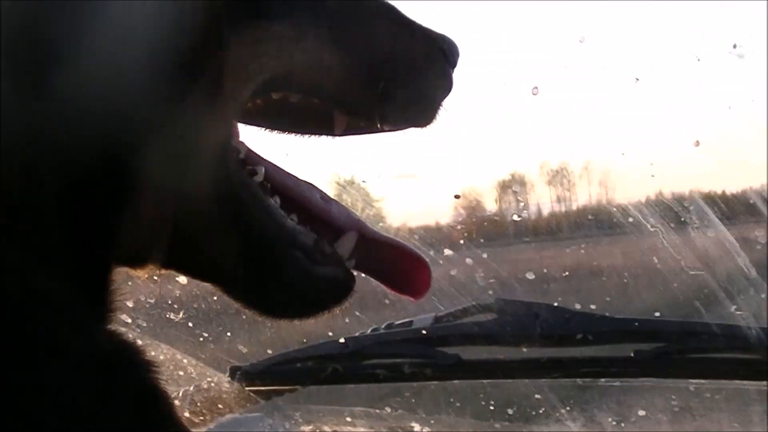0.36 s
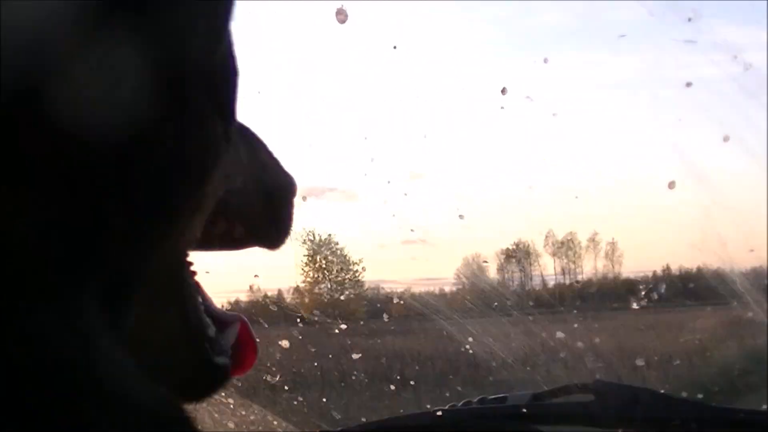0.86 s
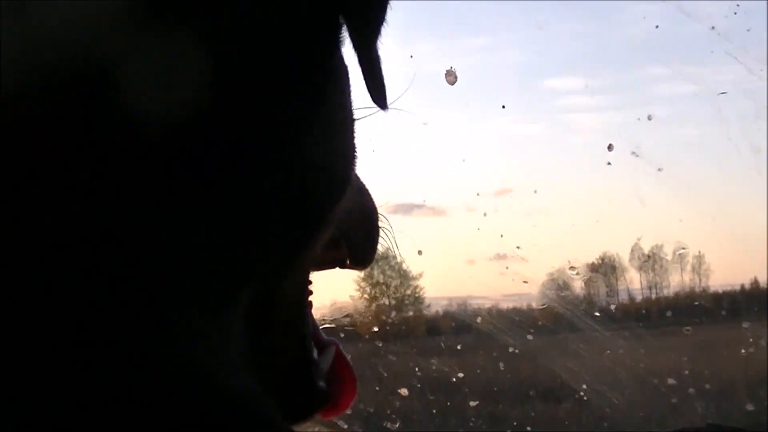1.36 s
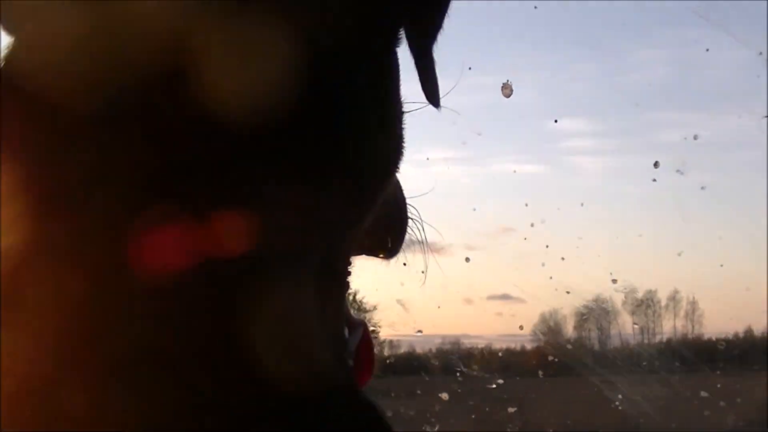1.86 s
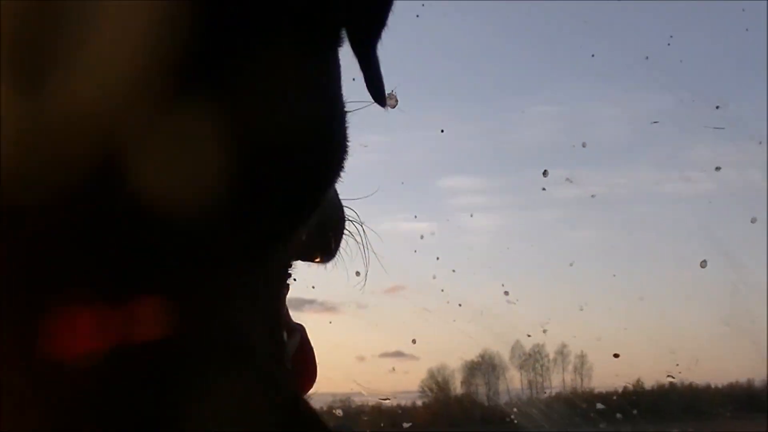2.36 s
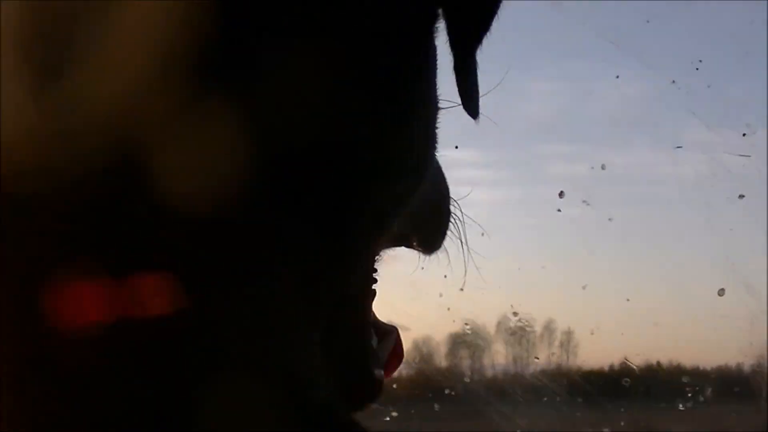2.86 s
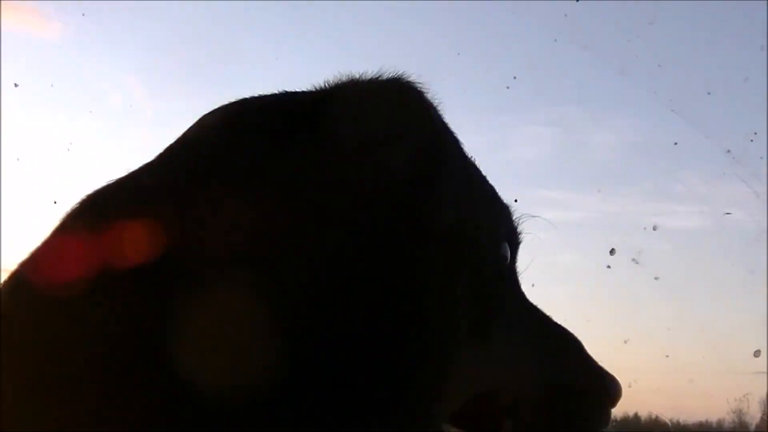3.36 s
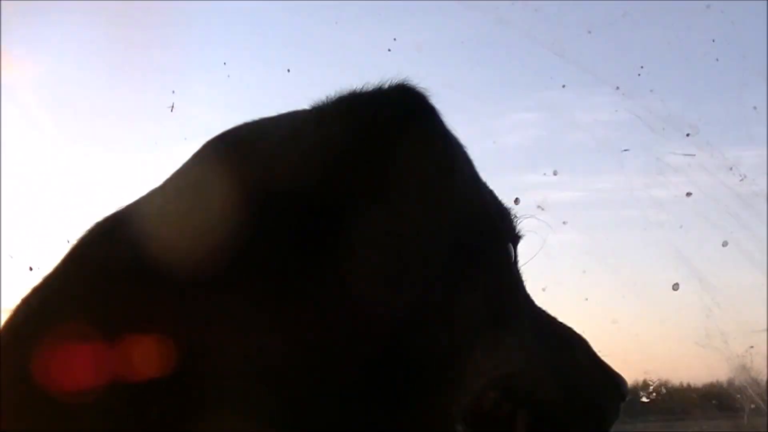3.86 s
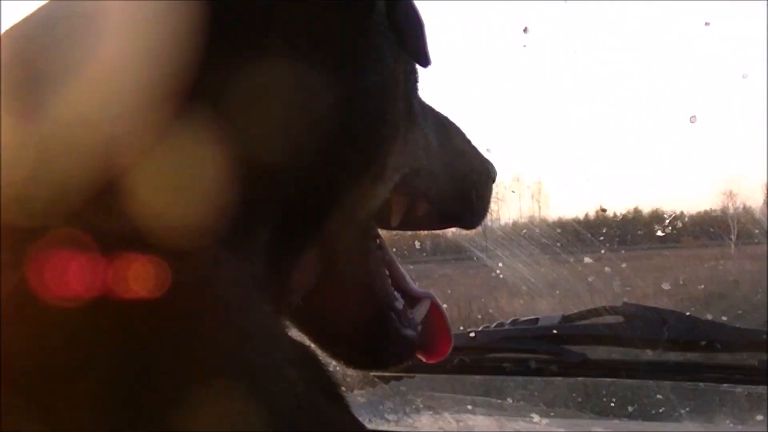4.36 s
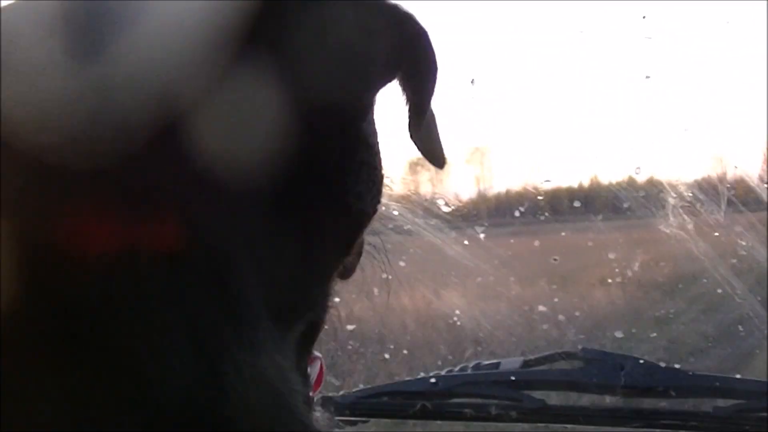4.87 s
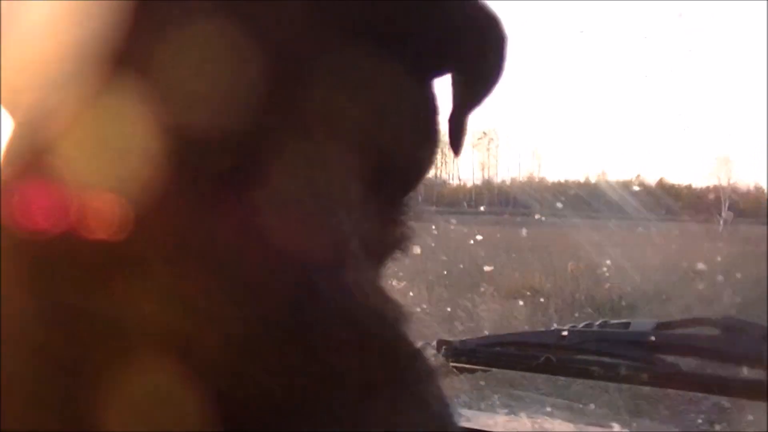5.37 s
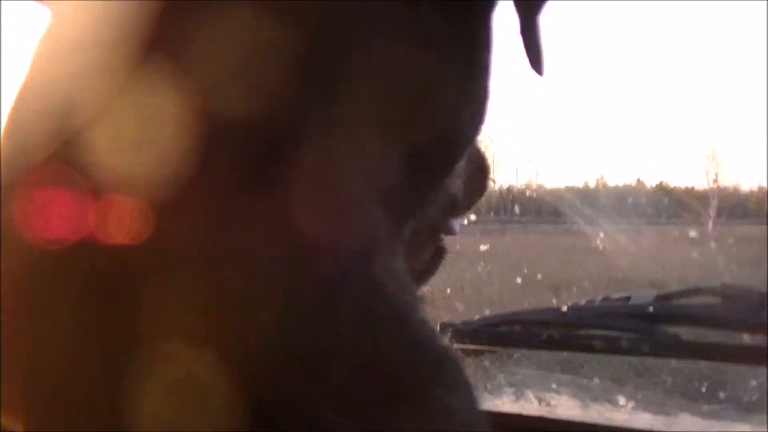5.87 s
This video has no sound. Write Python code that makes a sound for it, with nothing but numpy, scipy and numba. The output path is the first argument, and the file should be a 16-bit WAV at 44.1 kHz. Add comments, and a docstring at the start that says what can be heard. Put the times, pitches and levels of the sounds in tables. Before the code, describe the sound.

A soft, muffled car-cabin hum runs throughout, low under a dog whining very close to the microphone. The sound starts mid-cry, a hoarse scrap ending by 0.2 s, then a gasp at about 0.35 s. A long, raspy whine runs from 0.4 to 1.3 s, briefly clearing to a pitch. Quick breaths near 1.5 s lead to a weaker call until 2.1 s. A rough, lower-pitched, doubled-sounding call lasts 2.4 to 3.0 s; another, 3.2 to 3.9 s, sinks in pitch at its end. After a sharp indrawn breath at 4.1 s comes a strained squeal until 5.1 s, then another breath. From 5.3 s the voice bursts out hard, cracking up into a piercing whine around 5.6 s. The last call follows almost without a gap at 5.97 s, still sounding at the cut, 6.2 s. Small clicks in the throat open several calls; the close cabin gives a very short, dry echo, and peaks clip.

```python
"""Throughout, random noise shaped as the soft hum of a car cabin. A dog, close by, is already whining hoarsely.
Eight calls follow one another: vocal folds snap in mostly chaotic pulses, lock now and then to a clean pitch,
and ring the resonances of throat and mouth. Between calls: shaped-noise breaths and lone fold snaps.
Later calls jump at times towards the octave; the last is still sounding at the end.
A short dry echo follows the voice all along, and the loudest pulses clip."""
import sys
import numpy as np
from scipy import signal
from scipy.fft import rfft, irfft, next_fast_len
from scipy.io import wavfile
from scipy.ndimage import uniform_filter1d, minimum_filter1d, map_coordinates
from numba import njit

SR = 44100
rng = np.random.default_rng(int(sys.argv[2]) if len(sys.argv) > 2 else 0)


def unload_audio(sound):
    """Save the sound as a 16-bit wav file, at the path given as the first command line argument."""
    columns = np.transpose(np.atleast_2d(sound))
    # keep every value between -1 and 1, then stretch to whole-number steps
    steps = np.round(np.clip(columns, -1, 1) * 32767)
    wavfile.write(sys.argv[1], SR, steps.astype(np.int16))


def elevation(decibels):
    """Turn decibel levels (scalar or array-like) into linear amplitude ratios."""
    levels = np.asarray(decibels, float)
    return 10 ** (levels / 20)


N = 274732


def unit(x):
    """Scaled to rms 1."""
    return x / np.sqrt(np.mean(x ** 2) + 1e-20)


def steady(x, seconds):
    """Scaled to rms 1 in a running window."""
    return x / np.sqrt(np.abs(uniform_filter1d(x ** 2, round(seconds * SR))) + 1e-12)


def along(points, hz):
    """(Hz, value) points interpolated on a log frequency axis."""
    f, v = np.transpose(points)
    return np.interp(np.log(hz + 1), np.log(f + 1), v)


def curves(rows):
    """One value per sample for each column after the time."""
    s, *cols = np.transpose(rows)
    return [np.interp(np.arange(N) / SR, s, c) for c in cols]


def phrases(tables, silent):
    """Curves of several tables; the listed columns drop to silence just outside each table."""
    rows = []
    for table in map(np.array, tables):
        before, after = table[0].copy(), table[-1].copy()
        before[0] -= .003
        after[0] += .003
        before[silent] = after[silent] = -80
        rows += [before, *table, after]
    return curves(rows)


def swells(rows, rise_db_per_s, fall_db_per_s):
    """Gain that climbs to each (s, dB) peak and falls away."""
    t = np.arange(N) / SR
    gain = 0
    for s, db in rows:
        gain = gain + elevation(db + np.minimum(rise_db_per_s * (t - s), -fall_db_per_s * (t - s)))
    return gain


def wobble(rate):
    """A smooth random curve, rate knots a second."""
    knots = rng.standard_normal(int(N * rate / SR) + 4)
    return map_coordinates(knots, [np.arange(N) * rate / SR])


def filtered(x, response):
    """x times a complex response of frequency."""
    m = next_fast_len(N + 8192)
    return irfft(rfft(x, m) * response(np.fft.rfftfreq(m, 1 / SR)), m)[..., :N]


@njit
def two_pole(x, a1, a2):
    """A resonator with zeros at both ends of the band; its tuning moves sample by sample."""
    y = np.zeros(len(x))
    for i in range(2, len(x)):
        y[i] = x[i] - x[i - 2] + a1[i] * y[i - 1] - a2 * y[i - 2]
    return y


def resonance(x, hz, width_hz):
    """A resonance applied twice, so that the valleys beside it stay dark."""
    r = np.exp(-np.pi * width_hz / SR)
    a1 = 2 * r * np.cos(2 * np.pi * hz / SR) * np.ones(N)
    return two_pole(two_pole(x, a1, r * r), a1, r * r)


# Cabin noise level. Each row: time in seconds, relative level in dB.
CABIN_LEVEL_DB = [(0, -52.5), (1.3, -52), (4.4, -52.5), (6.23, -52.5)]
# Cabin noise colour. Each row: frequency in Hz, relative density in dB per Hz.
CABIN_COLOUR_DB = [(24, -75), (40, -44.5), (296, 2), (526, -4), (692, -0.5), (1110, -2.5), (1260, -7),
                   (1930, -5), (2080, -9.5), (2480, -5), (3430, -11.5), (4090, -9), (4410, -12),
                   (15800, -40)]
# Cabin noise likeness of left and right. Each row: frequency in Hz, correlation.
CABIN_ALIKE = [(60, 0.92), (240, 1), (950, 0.9), (3770, 0.74), (15000, 0.99)]
CABIN_PATCHY_DB = 1.6


def cabin():
    """Road and engine noise, dulled by the car body: shaped random noise, in slow patches."""
    level_db, = curves(CABIN_LEVEL_DB)

    def mid_side(hz):
        turn = np.arccos(np.clip(along(CABIN_ALIKE, hz), -1, 1)) / 2
        return elevation(along(CABIN_COLOUR_DB, hz)) * [np.cos(turn), np.sin(turn)]

    mid, side = filtered(rng.standard_normal((2, N)), mid_side)
    stereo = unit(np.array([mid + side, mid - side]))
    return elevation(level_db + 16.5 + CABIN_PATCHY_DB * wobble(16)) * stereo


def echo(x, t60_s):
    """Glass and seats return a short dense tail, different at each port."""
    t = np.arange(SR // 5) / SR
    tail = rng.standard_normal((2, len(t))) * elevation(-60 * t / t60_s)
    delayed = np.pad(x, (60, 0))[None]
    return signal.fftconvolve(delayed, tail / np.linalg.norm(tail[0]), axes=1)[:, :N]


# Indrawn breaths. Each row: peak time in seconds, relative peak level in dB.
BREATH_PEAKS_DB = [(.346, -51), (1.432, -56), (1.525, -51.5), (2.32, -64), (3.16, -67), (4.12, -44.5),
                   (5.22, -47)]
# Indrawn air colour. Each row: frequency in Hz, relative density in dB per Hz.
BREATH_COLOUR_DB = [(530, -47), (900, -34), (1920, -10), (2140, -15), (2390, -2), (2580, -1.5), (4100, 3),
                    (5380, -6.5), (12000, -25.5), (15600, -56), (22000, -120)]
BREATH_FLUTTER_DB = 2.8


def breath():
    """Air drawn in through the open mouth between calls: shaped, fluttering noise."""
    air = filtered(rng.standard_normal(N), lambda hz: elevation(along(BREATH_COLOUR_DB, hz)))
    gain = swells(BREATH_PEAKS_DB, rise_db_per_s=142, fall_db_per_s=295)
    return gain * elevation(10 + BREATH_FLUTTER_DB * wobble(90)) * unit(air)


# Voice of each call. Each row: tongue cavity in Hz, rasp re effort in dB, neck leak re throat in dB,
# muzzle overtones re hiss in dB.
VOICES = [(1950, -25.5, -19, -6.5), (2140, -25.5, -29.5, -2.5), (2350, -21.5, -16.5, -5.5),
          (2350, -27, -16.5, -3), (2290, -24, -22.5, 1.5), (2323, -25, -20, -4.5), (2236, -25.5, -21, -10),
          (2450, -21.5, -13, -9)]


def by_call(column):
    """A column of VOICES, held through each call."""
    rows = []
    for call, row in zip(CALLS, VOICES):
        rows += [(s, row[column]) for s in (call[0][0], call[-1][0])]
    return curves(rows)[0]


# Stretches where the folds lock to a pitch, one list each.
# Each row: time in seconds, pitch in Hz, roughness 0-1.
LOCKED = [
    [(.48, 330, .4), (.52, 400, .3)],
    [(.85, 415, .15), (.875, 419, .4), (.9, 413, .12), (.945, 404, .15), (.965, 400, .4), (1.01, 391, .33),
     (1.028, 387.5, .1), (1.05, 383, .12), (1.065, 383, .4), (1.12, 385, .3), (1.16, 385, .4)],
    [(1.75, 450, .22), (1.78, 467, .2), (1.795, 462, .25)],
    [(2.45, 240, .38), (2.69, 230, .33), (2.715, 229, .14), (2.75, 232, .2)],
    [(2.865, 176, .35), (2.9, 174, .1), (2.925, 172, .15)],
    [(3.25, 360, .35), (3.28, 372, .15), (3.305, 374, .18)],
    [(3.39, 382, .35), (3.41, 397, .36), (3.46, 385, .4)],
    [(3.63, 354, .1), (3.67, 340, .14), (3.69, 348, .17), (3.715, 319, .17), (3.74, 295, .16),
     (3.76, 264, .15), (3.795, 274, .14), (3.81, 258, .13), (3.84, 267, .12)],
    [(4.48, 419.5, .3)],
    [(4.575, 410, .15)],
    [(4.71, 365, .3), (4.73, 360, .22), (4.765, 405, .1), (4.78, 408, .04), (4.825, 405, .05)],
    [(4.9, 404, .3), (4.928, 420, .1), (4.95, 414, .22), (5, 398, .12), (5.02, 396, .14), (5.055, 375, .16)],
    [(5.455, 397, .22)],
    [(5.525, 513, .16), (5.545, 523, .13), (5.57, 521, .1), (5.62, 528, .05), (5.66, 509, .06),
     (5.7, 512, .07), (5.72, 497, .07), (5.74, 465, .08), (5.765, 448, .08)],
    [(5.86, 425, .42), (5.92, 410, .4), (5.945, 401, .12)],
    [(6.06, 416, .13), (6.085, 392, .13), (6.105, 398, .35), (6.125, 421, .15), (6.15, 409, .04),
     (6.175, 408, .08), (6.2, 400, .4)],
]
# Second snap halfway through each cycle; near 1 the voice jumps an octave.
# Each row: start in seconds, end in seconds, size 0-1.
JUMPS = [(2.406, 2.693, 0.57), (2.794, 2.94, 0.56), (5.573, 5.768, 0.99), (5.793, 5.972, 0.68),
         (6.12, 6.3, .75)]
# Time before its end at which each of the first six calls turns to breath, in seconds.
RUNS_OUT_S = [.05, .1, .11, .05, .055, .04]
HOARSE, SPENT = .5, .9  # roughness: usual, and as one of the first six calls runs out
SPENT_S, LOCK_S = .03, .022  # time to run out, time to lock


def fold_state():
    """Hoarse by default, cleaner where the folds lock, breathy as the first six calls run out."""
    t = np.arange(N) / SR
    pitch_hz = curves([row for run in LOCKED for row in run])[0]
    rough_rows = []
    for run in LOCKED:
        rough_rows.append((run[0][0] - LOCK_S, HOARSE))
        rough_rows += [(s, r) for s, _, r in run]
        rough_rows.append((run[-1][0] + LOCK_S, HOARSE))
    rough, = curves(rough_rows)
    spent = 0
    for call, early_s in zip(CALLS, RUNS_OUT_S):
        knots_s = call[-1][0] + np.array([-early_s, SPENT_S - early_s, .05, .1])
        spent = spent + np.interp(t, knots_s, [0, 1, 1, 0])
    twin = 0
    for start, end, size in JUMPS:
        twin = twin + size * np.interp(t, [start - .015, start, end, end + .015], [0, 1, 1, 0])
    return pitch_hz, rough + (SPENT - rough) * spent, np.clip(twin, .08, 1)


def folds():
    """One snap per cycle; roughness scatters its moment and size, makes bursts and lets air hiss through."""
    pitch_hz, rough, twin = fold_state()
    t = np.arange(N) / SR
    for call in CALLS[1:-1]:  # these calls open as a slow, more even creak that speeds up
        creak = (t >= call[0][0]) * np.exp(-np.abs(t - call[0][0]) / .045)
        pitch_hz = pitch_hz * (1 - creak) + 110 * creak
        rough = rough * (1 - .3 * creak)
    # counted in half cycles; the rate wavers when rough
    cycles = np.cumsum(2 * pitch_hz * (1 + .15 * rough ** 2 * wobble(40)) / SR)
    count = np.arange(1, int(cycles[-1]))
    at = np.interp(count, cycles, np.arange(N))
    i = at.astype(int)
    luck = rng.standard_normal((N // 20, 2))[:len(count)]
    at = at + .3 * rough[i] ** 2 * luck[:, 0] * SR / pitch_hz[i]
    size = np.where(count % 2, twin[i], 1) * elevation(6 * rough[i] ** 1.5 * luck[:, 1])
    # strong and weak cycles alternate for a while
    size *= elevation(5 * rough[i] * wobble(25)[i] * (-1) ** (count // 2))
    # windowed sinc places each snap between samples
    taps = np.floor(at)[:, None] + np.arange(-7, 9)
    off = taps - at[:, None]
    shape = size[:, None] * np.sinc(off) * np.cos(np.pi * off / 16) ** 2
    places = np.clip(taps, 0, N - 1).astype(int)
    snaps = steady(np.bincount(places.ravel(), shape.ravel(), N), 0.028)
    share = np.clip(1.6 * rough ** 3, 0, 1)
    hiss = rng.standard_normal((2, N))
    # steady air, a little stronger at each snap
    jet = hiss[1] * (16.0 + steady(uniform_filter1d(np.abs(snaps), size=40), 0.04))
    whistle = (.5 + 9 * twin ** 2) * snaps  # the octave whine carries its overtones far up
    source = np.sqrt(1 - share) * snaps + np.sqrt(share) * hiss[0]
    return source, jet + whistle, pitch_hz, rough, twin


# One table per call. Each row: time in seconds, effort in dB, share of throat in dB,
# of raised tongue in dB, of mouth in dB, throat in Hz, muzzle in Hz.
CALLS = [
    [(0.0, -10.5, -2, -13, -14, 1225, 4120), (0.024, -22, -5, -19, -7, 1180, 4100),
     (0.032, -16.5, -2.5, -15, -7.5, 1180, 4130), (0.05, -18, 1, -35, -11, 1220, 3930),
     (0.086, -12.5, -1.5, -25, -8, 1207, 3760), (0.148, -14, -1.5, -13.5, -12, 1213, 3920),
     (0.178, -15.5, -18, -6, -10, 1250, 4400), (0.2, -46, -5, 1, 2, 1300, 4140)],
    [(0.438, -13.5, -1.5, -15.5, -7.5, 1254, 3800), (0.576, -12.5, -7.5, -14.5, -8, 1157, 3610),
     (0.636, -13.5, -5.5, -15, -12, 1217, 3700), (0.884, -12.5, -10.5, -15.5, -1.5, 1165, 3770),
     (1.022, -14, -6.5, -19, -4, 1190, 3850), (1.148, -14, -8, -17, -2, 1280, 3860),
     (1.234, -20, -18, -2.5, -7, 1370, 4180), (1.258, -31.5, -13, -6, -3.5, 1320, 3940),
     (1.28, -54, -3, -2, -7, 1260, 4040)],
    [(1.559, -25.5, -6.5, -13, -3, 1190, 3960), (1.629, -18.5, -5.5, -21, -3, 1280, 3780),
     (1.677, -15, -7, -8, -6.5, 1190, 3830), (1.795, -19, -5, -22, -3.5, 1230, 3720),
     (1.843, -19.5, -3.5, -15, -4, 1144, 3830), (1.973, -23.5, -0.5, -21, -11.5, 1180, 3730),
     (2.007, -19, -13, -3.5, -12, 1320, 3870), (2.065, -34, -7, -6, -4, 1380, 3800),
     (2.08, -49, -4, -6, -12, 1330, 3780)],
    [(2.371, -16.5, -3.5, -15, -6, 1294, 3760), (2.429, -12, -10, -11.5, -17, 1340, 3410),
     (2.477, -15, -5.5, -11, -4.5, 1217, 3810), (2.667, -12.5, -9, -7.5, -6, 1183, 3770),
     (2.777, -13, -8, -7, -4, 1150, 3910), (2.923, -11, -15, -12.5, -21, 1340, 3490),
     (2.939, -15.5, -8.5, -14, -20, 1300, 3830), (2.955, -18, -14, -11, -19, 1290, 3840),
     (2.98, -50, -6, 5, -4, 1290, 3910)],
    [(3.198, -13, -3, -36, -7.5, 1200, 3850), (3.224, -12, -3, -18, -10.5, 1310, 3800),
     (3.286, -13, -15, -16.5, -11, 1167, 3730), (3.464, -13.5, -1.5, -20, -7.5, 1167, 3850),
     (3.66, -14, -5, -12.5, -10.5, 1187, 3980), (3.776, -14.5, -2.5, -29, -7.5, 1205, 3850),
     (3.848, -11.5, -4.5, -16, -12, 1264, 4040), (3.878, -19, -11.5, -7, -18, 1350, 4100),
     (3.9, -33.5, -3, -7, 0, 1350, 4100)],
    [(4.161, -14, -2, -17, -11, 1276, 3850), (4.247, -10.5, -13.5, -12, -13.5, 1240, 3920),
     (4.333, -22, -3.5, -12.5, -6.5, 1250, 4240), (4.419, -13, -7.5, -13, -1.5, 1248, 3940),
     (4.609, -13.5, -5, -12, -7, 1213, 3840), (4.789, -9, -16.5, -16, -15, 1275, 4140),
     (4.955, -12.5, -19, -11.5, -3, 1220, 3600), (5.059, -11, -16.5, -6.5, -9, 1130, 3750),
     (5.1, -32, -6, -2.5, -11, 1320, 3860)],
    [(5.286, -15.5, -6, -11.5, -9, 1160, 3900), (5.32, -3, -19.5, -7, -6.5, 1206, 4020),
     (5.402, -20, -3.5, -12, -21, 1153, 3460), (5.488, -11.5, -14, -12, -2.5, 1135, 3660),
     (5.68, -11.5, -1.5, -9, -3, 1040, 4200), (5.744, -16.5, -5.5, -15.5, 3, 1070, 3510),
     (5.782, -15, -9, -0.5, -7.5, 1110, 3880), (5.902, -23, -7, -5.5, -15, 1340, 4040),
     (5.96, -20.5, -4, -2, -6, 1080, 4120)],
    [(5.966, -12.5, -8, -1.5, -27, 1165, 3830), (6.026, -11.5, -7, -3, -25, 1190, 3620),
     (6.04, -15, -6, -8, -7, 1240, 3520), (6.064, -21.5, -18, 2, -20, 1200, 3700),
     (6.078, -24.5, -2, -20, -9, 1170, 3660), (6.106, -21, -1.5, -16, -9, 1116, 4200),
     (6.13, -16, -1, -17, -8.5, 1160, 4380), (6.23, -15.5, -5, -6.5, -15, 1160, 3910)],
]
MOUTH_HZ, MUZZLE_HZ = 2885, 3850  # cavities at rest
MOUTH_FOLLOWS = 0.48  # mouth shift per muzzle shift


def cavities(pitch_hz, twin):
    """Level and tuning of throat, tongue, mouth, muzzle; in an octave jump the throat tunes to the whine."""
    effort_db, *share_db, throat_hz, muzzle_hz = phrases(CALLS, silent=[1])
    # the muzzle rings with what is left
    rest_db = 10 * np.log10(np.clip(1 - sum(elevation(2 * db) for db in share_db), .04, 1))
    throat_db, tongue_db, mouth_db, muzzle_db = [effort_db + db for db in [*share_db, rest_db]]
    jumped = np.clip(5 * (twin - .55), 0, 1)
    throat_hz = throat_hz + jumped * (2 * pitch_hz - throat_hz)
    mouth_hz = MOUTH_HZ + MOUTH_FOLLOWS * (muzzle_hz - MUZZLE_HZ)
    return effort_db, [throat_db, throat_hz, tongue_db, by_call(column=0),
                       mouth_db, mouth_hz, muzzle_db, muzzle_hz]


# Single snaps of the folds around the start of calls. Each row: time in seconds, relative peak in dB.
CATCHES = [(0.4182, -11), (1.53, -20.5), (1.5424, -33), (2.3318, -22), (3.1826, -11.5), (4.138, -11.5)]
# Low chest note, swelling as the mouth closes. Each row: peak time in seconds, relative level in dB.
CHEST_PEAKS_DB = [(.17, -29), (1.2, -30), (2.01, -31.5), (2.95, -34), (3.14, -46), (3.85, -28), (4.29, -31),
                  (4.67, -35), (5.92, -35), (6.09, -30.5), (6.23, -32)]
# Hiss colour. Each row: frequency in Hz, relative level in dB.
AIR_COLOUR_DB = [(4500, -39), (5300, 7), (5900, 10), (6300, 9), (6800, 6.5), (7500, 4.5), (9000, 0.5),
                 (12000, -3.5), (16000, -10)]
CHEST_LEAK_DB = -34  # chest re effort, before roughness and twin snaps lower it
RASP_ROUGH_DB, RASP_LAG_S = 11, 0.0059  # rasp gain at full roughness; it builds a little after the voice
POCKET_HZ, POCKET_DB = 1656, -23  # small side cavity, dB re effort


def dog():
    """The snaps ring each cavity; neighbouring cavities swing in opposite sense."""
    source, jet, pitch_hz, rough, twin = folds()
    effort_db, tract = cavities(pitch_hz, twin)
    lag = np.exp(-1 / (RASP_LAG_S * SR))
    rasp_db = effort_db + by_call(column=1) + RASP_ROUGH_DB * rough
    rasp = signal.lfilter([1 - lag], [1, -lag], elevation(rasp_db))
    chest = swells(CHEST_PEAKS_DB, rise_db_per_s=256, fall_db_per_s=498)
    chest = chest + elevation(effort_db + CHEST_LEAK_DB - 25 * rough - 14 * twin)
    # a rough voice keeps dipping
    breaks = elevation(-10 * np.minimum(rough, .6) * np.clip(wobble(150), 0, 1.5))
    source, jet = breaks * source, np.sqrt(breaks) * jet
    catch = np.zeros(N)
    for s, db in CATCHES:
        catch[round(s * SR)] = elevation(db)

    voice = chest * elevation(-2) * steady(resonance(source, 375, 73), 0.038)
    # low harmonics leak through the neck
    voice += elevation(tract[0] + by_call(column=2)) * steady(resonance(source, 677, 220), 0.058)
    voice += elevation(effort_db + POCKET_DB) * steady(resonance(source, POCKET_HZ, width_hz=152), 0.088)
    for k, width_hz in enumerate([189, 410, 280, 734]):
        flutter_db = (1.0 + 1.23 * rough) * wobble(55)  # each cavity flutters on its own
        ring = steady(resonance(source, tract[2 * k + 1], width_hz), 0.089)
        voice += (-1) ** k * elevation(tract[2 * k] + flutter_db) * ring
    voice += elevation(-43) * resonance(catch, 1210, 194) + elevation(-37) * resonance(catch, 4100, 600)
    # the tract passes little above 5 kHz
    voice = signal.sosfilt(signal.butter(10, 4950, fs=SR, output="sos"), voice)

    teeth = steady(resonance(resonance(source, 4966, 390), 4966, 390), 0.05)
    air = steady(filtered(jet, lambda hz: elevation(along(AIR_COLOUR_DB, hz))), 0.25)
    for ratio, db in [(1.54, -3.5), (1.74, -1)]:  # overtones of the muzzle cavity
        overtone = steady(resonance(source, ratio * tract[7], 320), 0.074)
        air += elevation(by_call(column=3) + db + 3.5 * wobble(13)) * overtone
    teeth_gain = 0.32 + 5.7 * (twin * (1 - rough)) ** 4
    return voice + rasp * elevation(2.9 * wobble(20)) * (teeth_gain * teeth + .5 * air)


# Voice balance between the ports. Each row: frequency in Hz, left minus right in dB.
BALANCE_DB = [(130, -.5), (290, -2.5), (640, 3), (1410, -4.5), (3100, -3), (6820, 4.5), (15000, -2)]
# Voice phase between the ports. Each row: frequency in Hz, lead of the left in radians.
LEAD_RAD = [(0, 0), (1030, -0.4), (1550, -0.0), (2500, -0.1), (3100, 0.2), (4820, 0.0), (5770, 0.1),
            (7320, -0.1), (15500, 0.0)]
VOICE_DB = 5.5  # voice over the effort scale


def scene():
    """The dog stands a little to one side of two microphone ports; walls and cabin noise add to it."""
    voice = elevation(VOICE_DB) * dog() + breath()
    dulled = filtered(voice, lambda hz: 1 / (1 + (hz / 4000) ** 2))  # seats soak up treble
    walls = elevation(-19) * echo(dulled, t60_s=.06)
    sides = np.array([[.5], [-.5]])

    def ports(hz):
        return elevation(sides * along(BALANCE_DB, hz)) * np.exp(1j * sides * along(LEAD_RAD, hz))

    return filtered(voice, ports) + walls + cabin()


def band_limit(x):
    """A steep low-pass at the top of the band."""
    return signal.sosfilt(signal.butter(12, 15930, fs=SR, output="sos"), x)


GAIN_KNEE_DB, GAIN_SQUEEZE, GAIN_S = -28.5, 0.24, 0.055  # gain control: onset, dB taken per dB, memory


def record(dry):
    """Small capsules lose deep bass; gain control sinks all under loud calls; limited snap tips still clip."""
    sound = filtered(dry, lambda hz: 1 / np.sqrt(1 + (90 / (hz + 1)) ** 4))
    memory = np.ones(round(GAIN_S * SR)) / round(GAIN_S * SR)
    power = np.abs(signal.fftconvolve(np.mean(sound ** 2, 0), memory)[:N])
    level_db = 10 * np.log10(power + 1e-9)
    sound = sound * elevation(-GAIN_SQUEEZE * np.maximum(level_db - GAIN_KNEE_DB, 0))
    needed = np.minimum(1, 1.24 / (np.abs(sound).max(0) + 1e-9))
    sound = sound * uniform_filter1d(minimum_filter1d(needed, size=130), size=90)
    clipped = sound / (1 + np.abs(sound / .99) ** 14) ** (1 / 14)
    return band_limit(clipped)


dry = scene()
out = record(dry)
unload_audio(out)
```